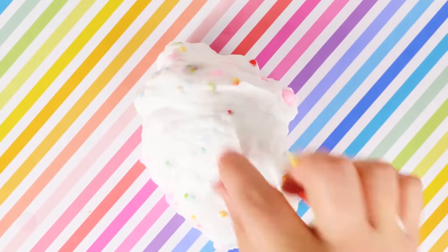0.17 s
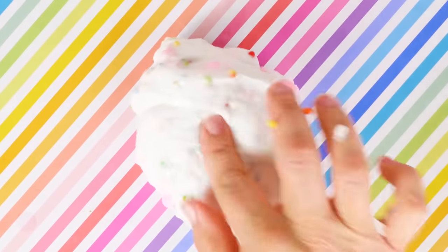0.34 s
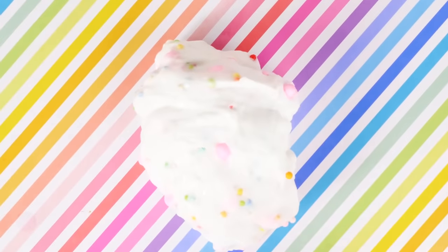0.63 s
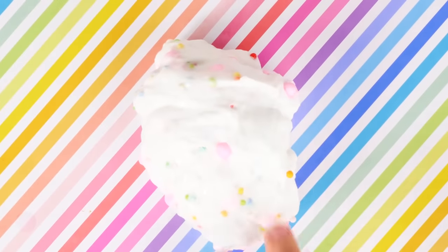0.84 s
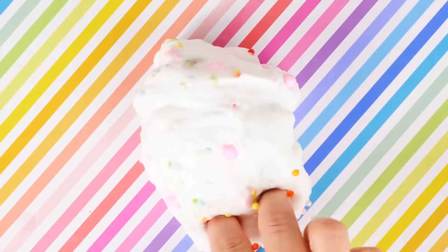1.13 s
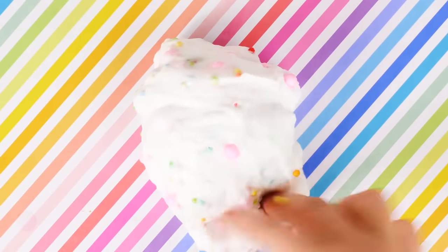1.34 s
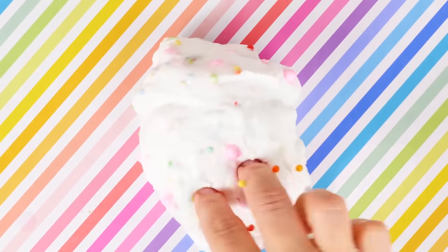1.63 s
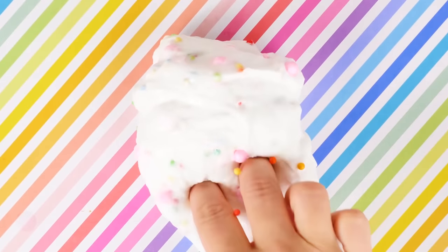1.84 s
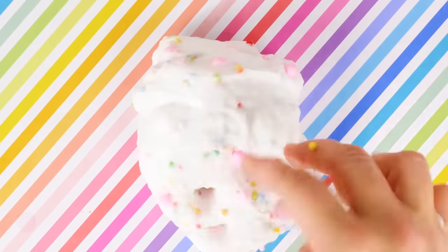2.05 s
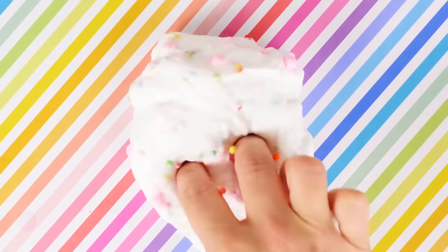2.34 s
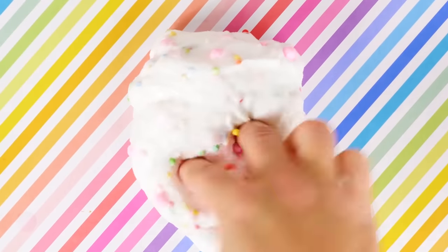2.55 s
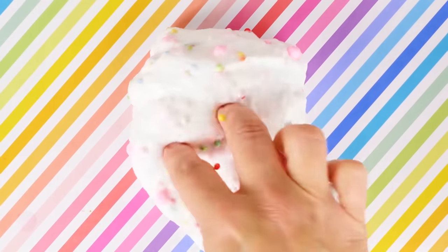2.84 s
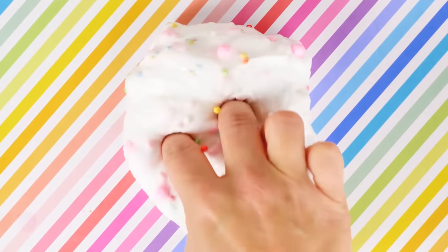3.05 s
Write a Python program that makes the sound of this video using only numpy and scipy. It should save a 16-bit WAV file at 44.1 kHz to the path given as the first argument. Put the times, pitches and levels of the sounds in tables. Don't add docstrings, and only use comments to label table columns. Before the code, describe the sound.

Fluffy slime is poked by two fingers close to a phone microphone: faint crackles and ticks, then sticky snaps and pops on each pull, growing louder, over a soft ventilation hum in a small quiet room.

```python
import sys
import numpy as np
from scipy import signal
from scipy.fft import rfft, irfft
from scipy.io import wavfile
from scipy.ndimage import map_coordinates

SR = 44100
rng = np.random.default_rng(int(sys.argv[2]) if len(sys.argv) > 2 else 0)


def natural_amplitude(level_db):
    exponent = np.asarray(level_db, float) / 20
    return 10 ** exponent


def unload_wav(signal):
    wavfile.write(
        sys.argv[1],
        SR,
        np.round(np.clip(np.atleast_2d(signal).T, -1, 1) * 32767).astype(np.int16),
    )


N = 141120

# f/Hz, density/dB [per Hz]
AIR_SPECTRUM = [(24, -71), (40, -33), (145, -2), (211, -17), (725, -14), (1200, -18), (11600, -31),
                (15300, -30), (16500, -51)]
# f/Hz, width/Hz, level/dB [rms]
DUCT_MODES = [(140, 17, -75), (112, 14, -81), (450, 40, -80), (695, 80, -73), (750, 50, -76),
              (2200, 550, -77)]
# f/Hz, likeness/1
AIR_LIKENESS = [(60, 1.0), (150, 1.0), (380, 0.99), (950, 0.85), (2380, 0.43), (5980, 0.65), (8800, .9),
                (13000, .6)]
# t/s, level/dB, f/Hz, t60/s
TABLE_THUMPS = [(1.256, -56, 210, .05), (1.462, -45, 156, 0.19), (1.4745, -47, 427, .02),
                (2.0732, -39, 155, .13), (2.08, -43, 320, 0.039), (2.131, -41, 340, .06),
                (2.114, -38, 200, 0.1), (1.452, -46, 300, .04), (2.165, -43, 260, 0.07),
                (2.688, -36, 155, 0.1), (2.696, -33.5, 304, 0.018), (2.701, -35, 211, 0.096),
                (2.724, -35, 149, 0.26), (2.726, -35, 205, .08), (2.735, -36, 432, 0.03),
                (2.742, -28, 288, .06), (.27, -53, 83, 1)]
# t/s, length/s, level/dB [rms],
# f/Hz [centre], width/octave
SLOW_CRACKLES = [(0.35, 0.18, -65, 12600, 0.55), (0.48, 0.031, -57, 10800, 0.31), (.39, 0.13, -70, 1600, 1),
                 (1.031, 0.079, -67.5, 11500, 0.26), (1.13, 0.068, -65, 13000, 0.36),
                 (1.245, 0.088, -61, 1400, .7), (1.24, 0.046, -67.5, 10000, .4),
                 (1.8, .07, -71.5, 10400, .5), (1.895, 0.07, -64, 750, 1.1), (2.329, 0.3, -70, 1230, 0.69),
                 (2.328, 0.27, -78, 8400, 0.49), (3.141, 0.045, -64.5, 530, 0.86),
                 (2.5, 0.12, -67, 780, .35), (2.095, .12, -52, 260, .4), (2.715, .05, -48, 550, .9),
                 (2.677, .016, -58, 7000, 1),
    (2.058, .02, -58, 10500, .4),
    (1.4275, .008, -52, 4000, 1.3),
    (1.112, .11, -65, 2300, .6),
    (1.244, .08, -66, 4000, .15),
]
# t/s, level/dB [peak], f/Hz
CELL_TICKS = [(.4795, -47, 12000), (.495, -34, 9200), (1.141, -54, 10000), (1.152, -54, 11000),
              (1.165, -37, 11900), (1.181, -52, 12000), (1.1952, -29, 11600), (1.234, -44, 9150),
              (1.741, -39.5, 12830), (1.827, -44, 10500), (1.855, -55, 7600), (1.884, -49, 9050),
              (1.941, -43, 8100), (1.9415, -51, 5500), (1.941, -44, 14000), (2.386, -51, 10700),
              (2.55, -49, 7060), (2.371, -51, 2550), (1.805, -53, 2460)]
# t/s, level/dB
# [peak], f/Hz, t60/s
FILM_SNAPS = [(1.1075, -30, 2900, .002), (1.1077, -40, 800, .008), (1.109, -33, 1600, .006),
              (1.1938, -35, 4500, .0012), (1.163, -46, 7000, .0012), (1.2195, -44, 2600, .004),
              (1.222, -47, 11000, .001), (1.2478, -37, 2300, .003), (1.2555, -42, 2700, .004),
              (1.2655, -39, 1900, .003), (1.277, -42, 2800, .004), (1.2815, -43, 1400, .005),
              (1.288, -44, 2500, .004), (1.301, -45, 2700, .004), (1.313, -46, 1500, .005),
              (1.4298, -42, 1500, .003), (1.4324, -26, 1400, .008), (1.4325, -34, 3900, .002),
              (1.4745, -39, 4100, .009), (1.481, -43, 4150, .014), (2.0745, -33, 1850, .007),
              (2.0735, -35, 2900, .005), (2.075, -36, 4500, .005), (2.075, -35, 650, .012),
              (2.082, -36, 700, .012), (2.1126, -24, 270, .009), (2.1216, -29, 290, .02),
              (2.315, -50, 8500, .0008), (2.362, -50, 10000, .001), (2.409, -47, 10000, .0008),
              (2.4535, -48, 10200, .001), (2.489, -53, 6500, .0015), (2.521, -51, 5000, .0015),
              (2.543, -52, 9000, .001), (2.566, -49, 6200, .0015), (2.58, -48, 800, .012),
              (2.512, -50, 700, .012), (2.6965, -29, 600, .008), (2.7065, -38, 10800, .002),
              (2.7163, -27, 2800, .003), (2.7285, -24, 680, .008), (2.7332, -25, 480, .009)]
# t/s, level/dB [rms], length/s, f/Hz [centre], width/octave
FILM_TEARS = [(1.1085, -50, .011, 2000, .8), (1.108, -56, .004, 12500, 0.3),
              (1.4316, -35, 0.0031, 8800, 0.58), (1.4336, -45, .022, 1500, .5),
              (1.437, -43, 0.013, 11200, 0.62), (1.4625, -42, .012, 10100, .44),
              (1.461, -46, 0.025, 1150, 1.1), (2.0706, -42.5, 0.016, 10800, .4),
              (2.072, -47, 0.02, 2000, 1.0), (2.096, -46.5, .016, 9200, 0.62), (2.097, -46, .02, 420, .7),
              (2.6865, -34.5, .009, 8600, 0.5), (2.6851, -37.5, 0.022, 1770, 1.14),
              (2.7162, -27, .0034, 7500, .55), (2.7193, -24, 0.0085, 7200, 0.43),
              (2.72, -27.5, 0.013, 1620, 1.37), (1.194, -46, 0.0016, 11500, 0.53),
              (1.1946, -51.5, .003, 3500, 0.82)]
# t/s, level/dB,
# f/Hz [cavity or tone], t60/s
CAVITY_POPS = [(1.1105, -41, 1415, 0.012), (1.11, -43, 673, 0.027), (1.434, -26, 1200, .011),
               (1.4405, -33, 1450, .01), (1.109, -39, 4200, 0.0092), (1.4413, -27, 10300, .006),
               (1.4433, -30, 9900, .005), (1.4432, -37, 4050, 0.006), (1.448, -29, 9700, .005),
               (1.4515, -41, 9700, .005), (2.0734, -28.5, 10480, .005), (2.102, -37.5, 2400, 0.011),
               (2.11, -41, 2420, 0.013), (2.6871, -26, 1230, .024), (2.687, -32, 4170, .02),
               (2.7206, -21, 2320, .03), (2.7207, -21, 6300, .016), (2.7235, -22, 9800, .01),
               (2.7235, -26, 655, .045), (2.7215, -28, 3340, .02), (2.722, -30, 4570, .025),
               (2.7225, -32, 7400, .02), (2.6895, -28, 9600, .006)]
# f/Hz, t60/s
ROOM_T60 = [(150, 0.44), (500, 0.51), (1200, 0.83), (3000, 0.95), (6000, 0.77), (9000, 0.62), (14000, 0.34)]
# f/Hz, likeness/1
ROOM_LIKENESS = [(60, 1.0), (150, 1.0), (620, 1), (950, 0.83), (2380, 0.7), (5980, 0.95), (15000, 0.81)]
# f/Hz, level/dB
ROOM_TONE = [(100, -7), (550, 1), (1050, 3.5), (2400, -3), (3600, 1), (5300, -5), (6800, -.5), (10000, -4)]
# f/Hz, level/dB
PORT_LEAN = [(500, 0), (1200, -1.1), (3000, -1.1), (6000, -.2), (14000, .3)]
# f/Hz, phase/rad
PORT_LEAD = [(600, 0), (1500, .3), (2800, .2), (5000, 0.26), (10000, 0.062), (14200, -0.46)]


def evened(x):
    return x / np.sqrt(np.mean(x ** 2) + 1e-20)


def read(points, hz):
    f, value = np.transpose(points)
    return np.interp(np.log(hz + 1), np.log(f + 1), value)


def add(mix, s, sound):
    part = mix[round(s * SR):][:len(sound)]
    part += sound[:len(part)]


def shaped(x, gain):
    spectrum = rfft(x)
    hz = np.fft.rfftfreq(x.shape[-1], 1 / SR)
    return irfft(spectrum * gain(hz), x.shape[-1])


def pair(a, b, likeness):
    def middle(hz):
        return np.sqrt(np.clip((1 + read(likeness, hz)) / 2, 0, 1))

    mid = shaped(a, middle)
    side = shaped(b, lambda hz: np.sqrt(1 - middle(hz) ** 2))
    return np.array([mid + side, mid - side])


def ring(db, hz, t60, glide=0.057, rise=2):
    t = np.arange(round(t60 * SR)) / SR
    turns = hz * (t + glide * t ** 2 / t60)
    onset = np.minimum(t * hz * rise, 1)
    return natural_amplitude(db - 60 * t / t60) * np.sin(2 * np.pi * turns) * onset


def crackle(hz, octaves, per_s, spread_db, count=5):
    chance, size, sign = rng.random((16384, count, 3)).T
    struck = chance < per_s / count / SR
    snaps = struck * natural_amplitude(-spread_db * np.log(size + 0.015)) * np.sign(sign - .5)
    steps = np.linspace(-1.6, 1.6, count)[:, None]

    def bell(f):
        offset = np.log2((f + 1) / hz) / octaves - steps
        return np.exp(-.5 * (offset / .5) ** 2 - .5 * steps ** 2)

    return evened(shaped(snaps, bell).sum(0))


def hum():
    hum_db, waver_db, waver_hz = -64.5, 3.5, 7.
    a, b = rng.standard_normal((2, N))
    flow = shaped(pair(a, b, AIR_LIKENESS), lambda hz: natural_amplitude(read(AIR_SPECTRUM, hz)))
    air = natural_amplitude(hum_db) * evened(flow)
    for centre_hz, width_hz, db in DUCT_MODES:
        c, d, slow = rng.standard_normal((3, N))
        duct = shaped(pair(c, d, AIR_LIKENESS), lambda f: 1 / (1 + (2 * (f - centre_hz) / width_hz) ** 2))
        waver = evened(shaped(slow, lambda f: np.exp(-(f / waver_hz) ** 2)))
        air = air + natural_amplitude(db + waver_db * waver) * evened(duct)
    return air


def thumps():
    out = np.zeros(N)
    for s, db, hz, t60 in TABLE_THUMPS:
        add(out, s, ring(db, hz, t60, glide=-0.019))
    return out


def squeezes_and_stretches():
    out, t = np.zeros(N), np.arange(16384) / SR
    for s, length, db, hz, octaves in SLOW_CRACKLES:
        swell = np.sin(np.pi * np.clip(t / length, 0, 1) ** 1.05) ** 0.59 * (t < length)
        fizz = crackle(hz, octaves, per_s=3000., spread_db=4.2)
        add(out, s, natural_amplitude(db) * swell * fizz)
    return out


def ticks():
    decay_cycles, boost_db = 2.5, 1.5
    out = np.zeros(N)
    for s, db, hz in CELL_TICKS:
        add(out, s, ring(db + boost_db, hz, decay_cycles * np.log(1000) / hz))
    return out


def snaps():
    out = np.zeros(N)
    for s, db, hz, t60 in FILM_SNAPS:
        add(out, s, ring(db, hz, t60, rise=8.))
    return out


def tears():
    sag_db, tail_s = -5, 0.0016
    out, t = np.zeros(N), np.arange(16384) / SR
    for s, db, length, hz, octaves in FILM_TEARS:
        onset = np.minimum(t / 0.0002, 1)
        sag = natural_amplitude(sag_db * np.minimum(t / length, 1))
        tail = np.exp(-np.maximum(t - length, 0) / tail_s)
        clicks = crackle(hz, octaves, per_s=12000., spread_db=3.)
        add(out, s, natural_amplitude(db) * onset * sag * tail * clicks)
    return out


def pops():
    out = np.zeros(N)
    for s, db, hz, t60 in CAVITY_POPS:
        add(out, s, ring(db, hz, t60))
    return out


def room(x):
    near_db, near_t60_s, room_db = -6.5, 0.03, -9.5
    stir_s, stir_hz = .00012, (7.3, 11.9, 18.1)
    seconds = np.arange(SR) / SR
    taps = rng.standard_normal((4, SR))

    hz, t, z = signal.stft(taps[:2], SR, nperseg=256)
    decay_db = -60 * t / read(ROOM_T60, hz)[:, None]
    z = z * natural_amplitude(read(ROOM_TONE, hz)[:, None] + decay_db)
    tail = signal.istft(z, SR, nperseg=256)[1][:, :SR]
    tail = tail * np.minimum(seconds / 0.004, 1)
    tail = pair(*(tail / np.linalg.norm(tail[0])), ROOM_LIKENESS)

    sparse = rng.random((2, SR)) < .06
    echoes = taps[2:] * sparse * natural_amplitude(-60 * seconds / near_t60_s)
    echoes = natural_amplitude(near_db) * pair(*echoes, ROOM_LIKENESS) / np.linalg.norm(echoes[0])

    near = signal.fftconvolve(x[None], echoes, axes=1)[:, :N]
    far = signal.fftconvolve(x[None], natural_amplitude(room_db) * tail, axes=1)[:, :N]
    stir = sum(np.sin(2 * np.pi * f * np.arange(N) / SR) for f in stir_hz)
    at = np.arange(N) + stir_s * SR * stir
    return near + np.array([map_coordinates(v, [at], order=3, mode="nearest") for v in far])


def scene():
    slime = thumps() + squeezes_and_stretches() + ticks() + snaps() + tears() + pops()
    low_cut = signal.butter(2, 122, "high", fs=SR, output="sos")
    direct = signal.sosfilt(low_cut, slime)
    wet = direct + room(direct)

    def skew(f):
        return natural_amplitude(read(PORT_LEAN, f) / 2) * np.exp(.5j * read(PORT_LEAD, f))

    left = shaped(wet[0], skew)
    right = shaped(wet[1], lambda f: 1 / skew(f))
    return np.array([left, right]) + hum()


def roll_off(x):
    return signal.sosfilt(signal.butter(12, 16500, fs=SR, output="sos"), x)


def record(dry):
    top_cut_hz = 15200
    mix = shaped(dry, lambda f: 1 / np.sqrt(1 + (f / top_cut_hz) ** 70))
    return roll_off(mix)


dry = scene()
out = record(dry)
unload_wav(out)
```